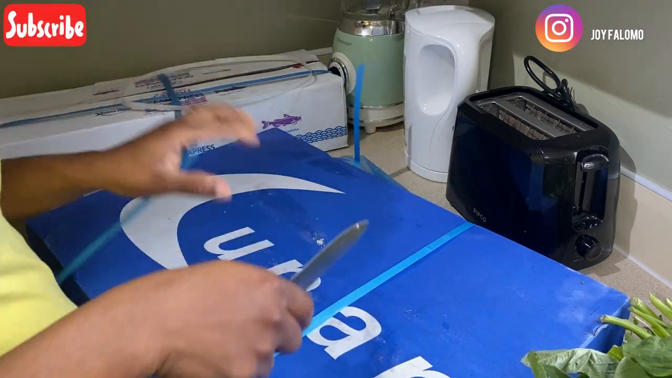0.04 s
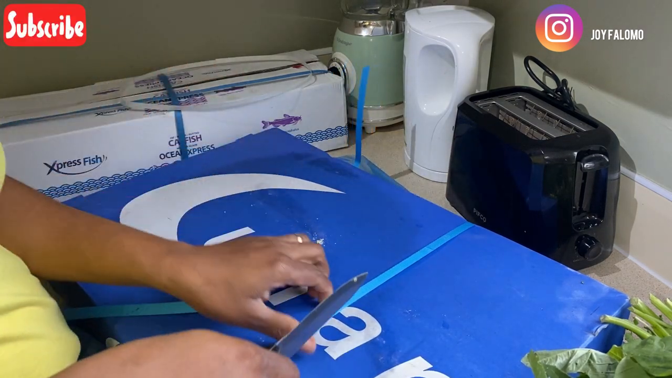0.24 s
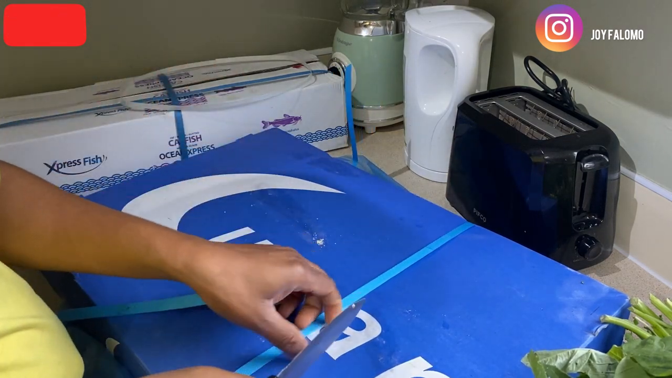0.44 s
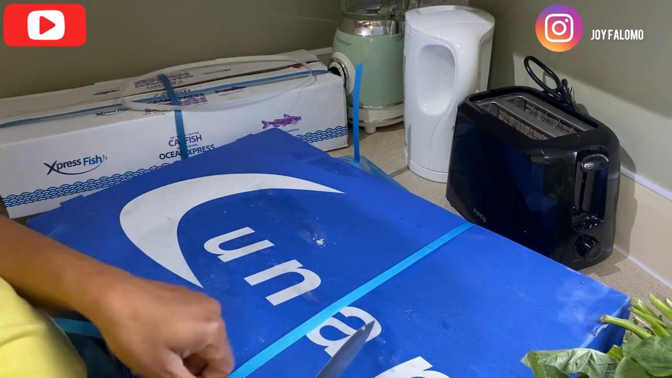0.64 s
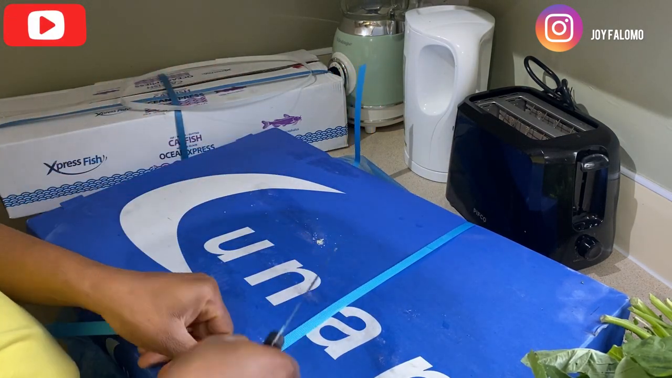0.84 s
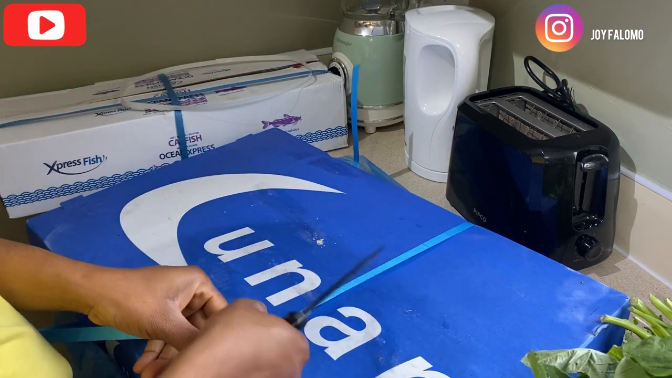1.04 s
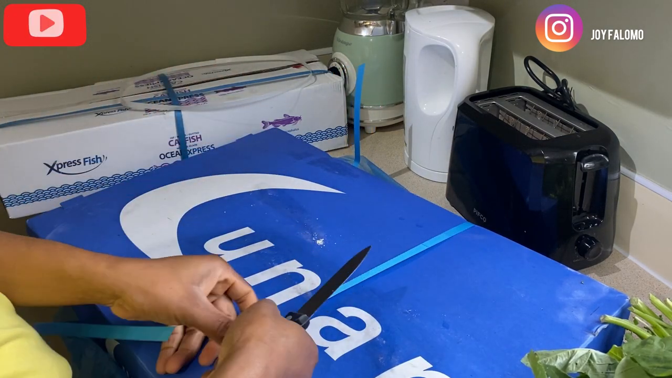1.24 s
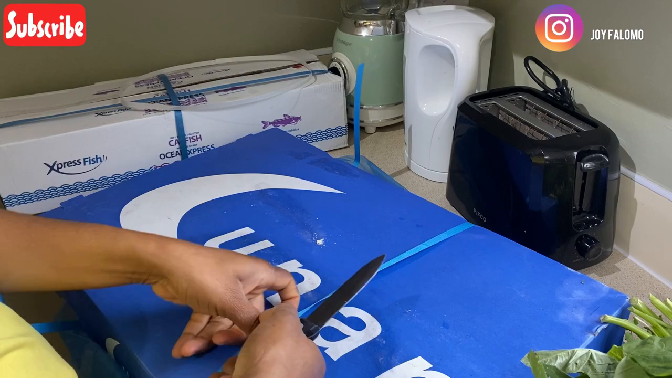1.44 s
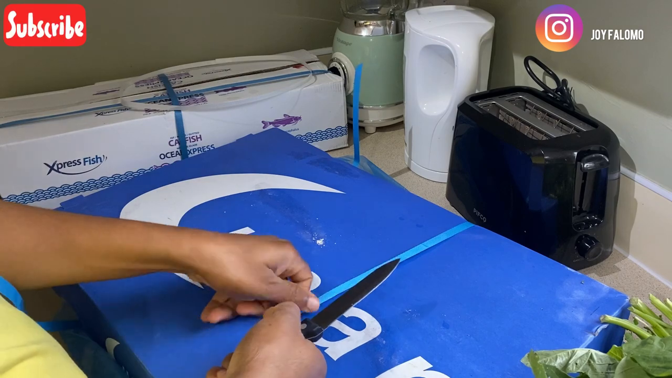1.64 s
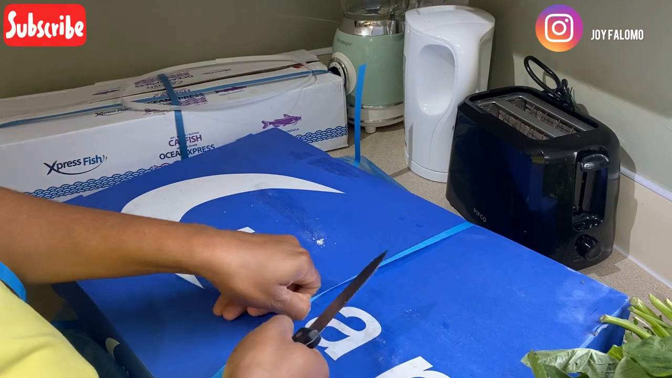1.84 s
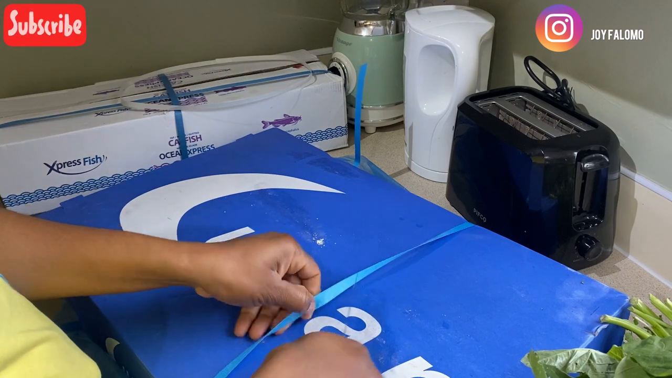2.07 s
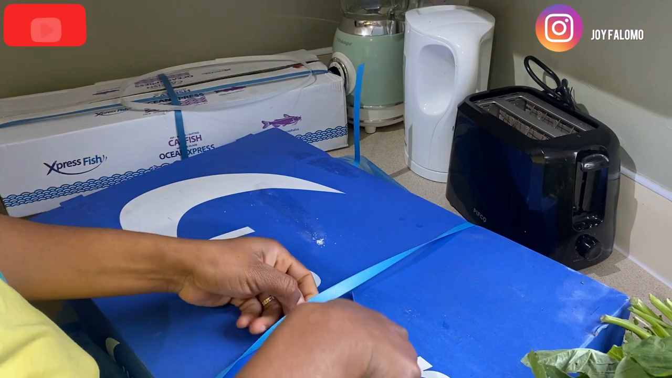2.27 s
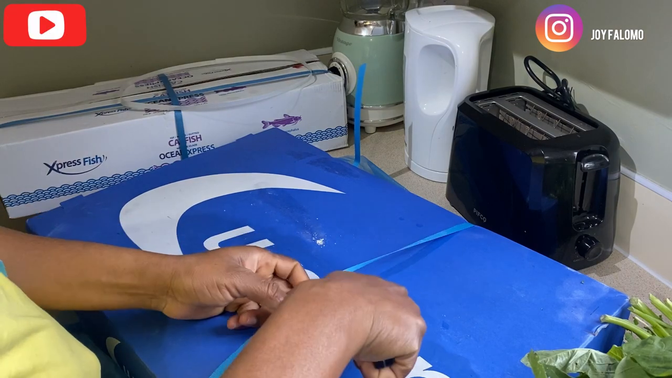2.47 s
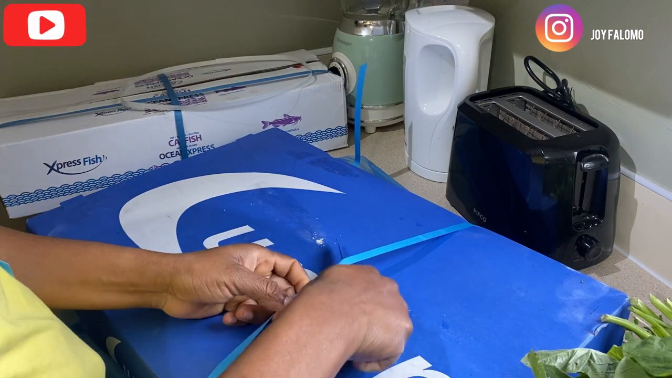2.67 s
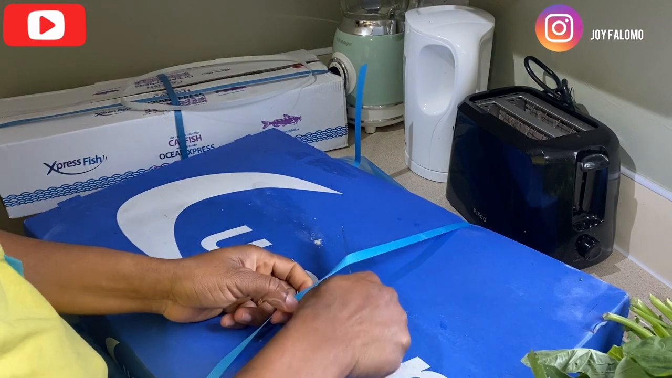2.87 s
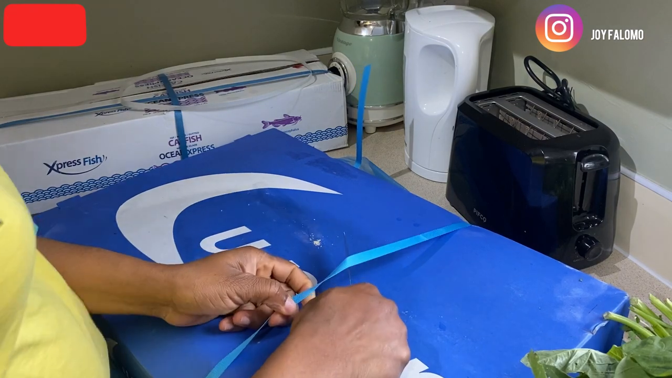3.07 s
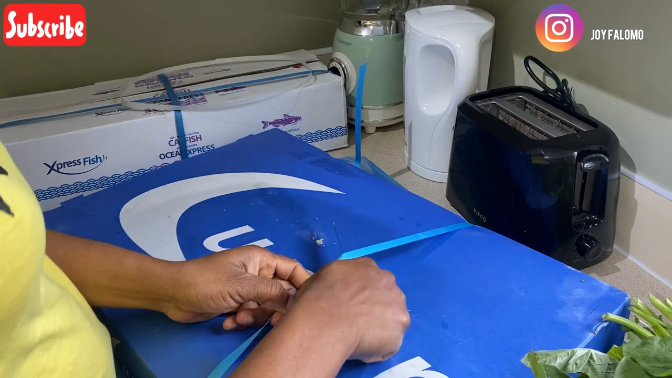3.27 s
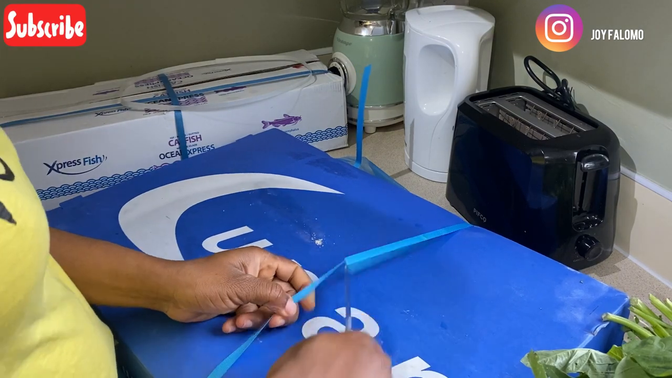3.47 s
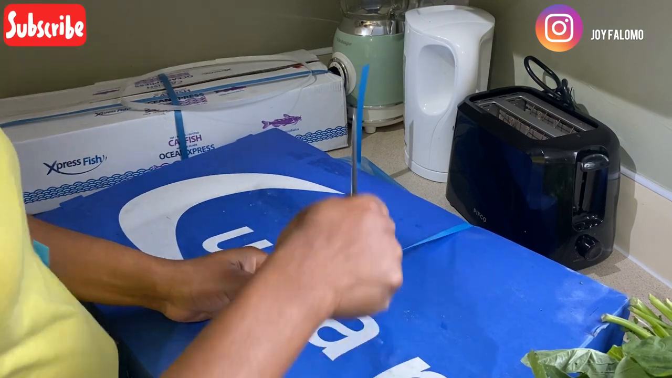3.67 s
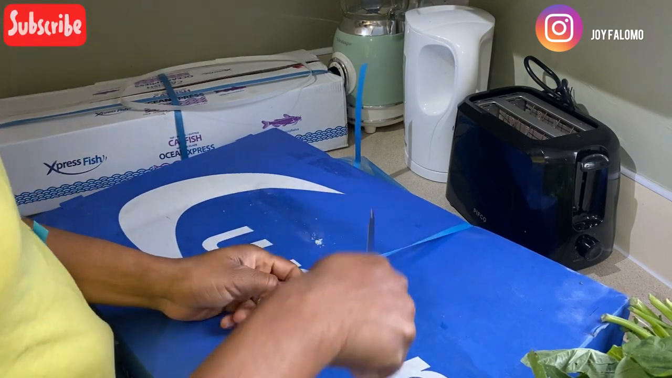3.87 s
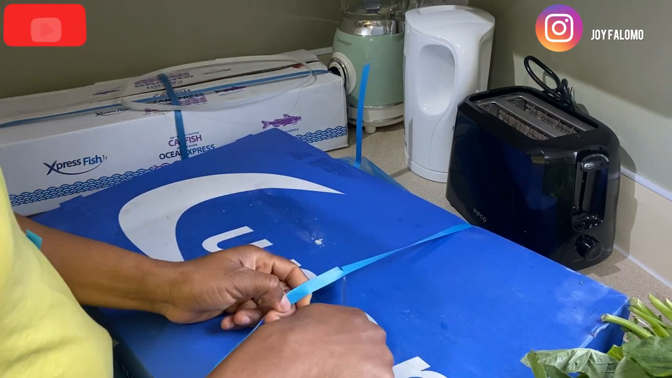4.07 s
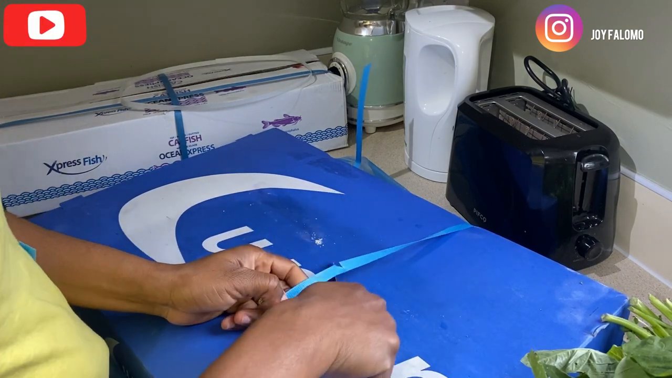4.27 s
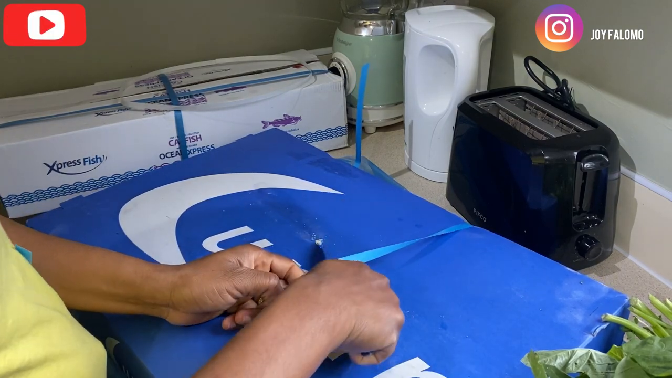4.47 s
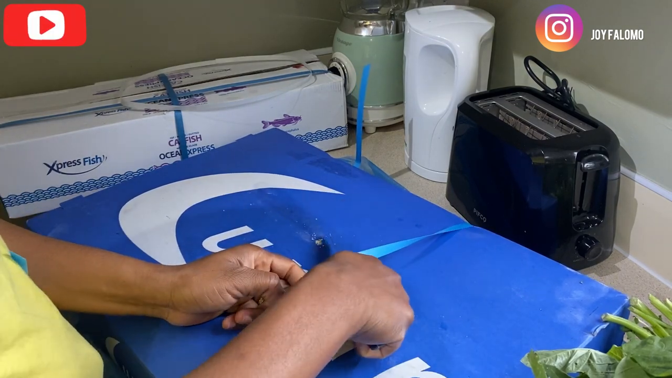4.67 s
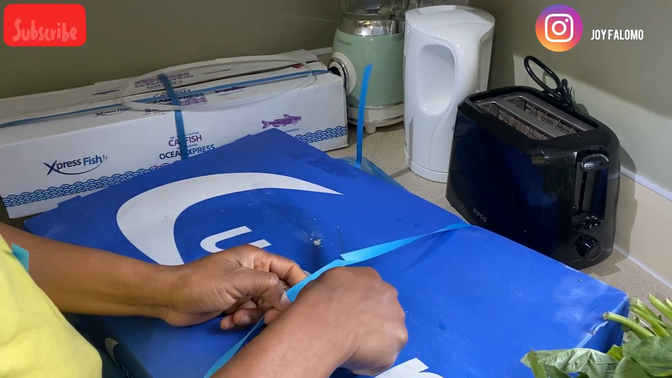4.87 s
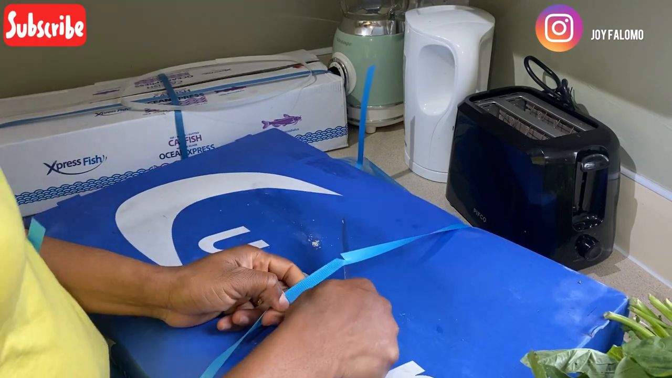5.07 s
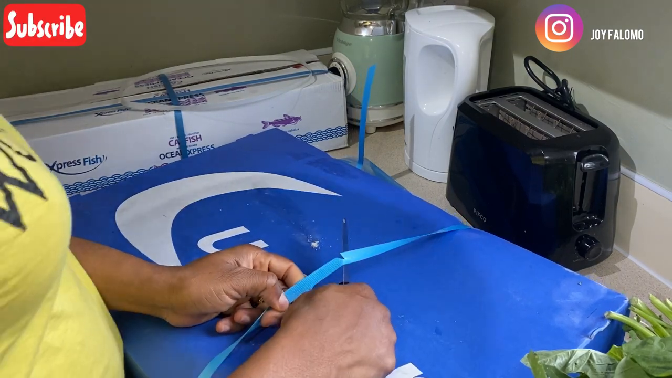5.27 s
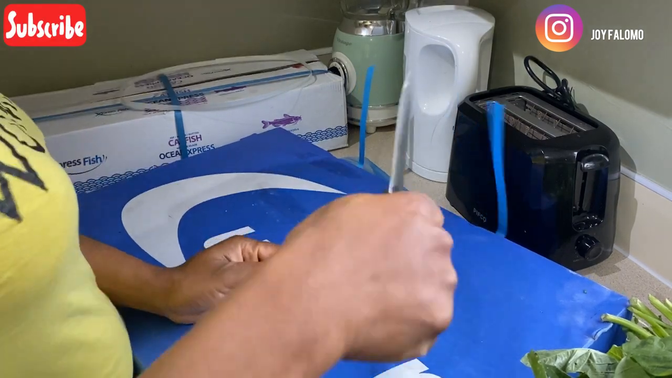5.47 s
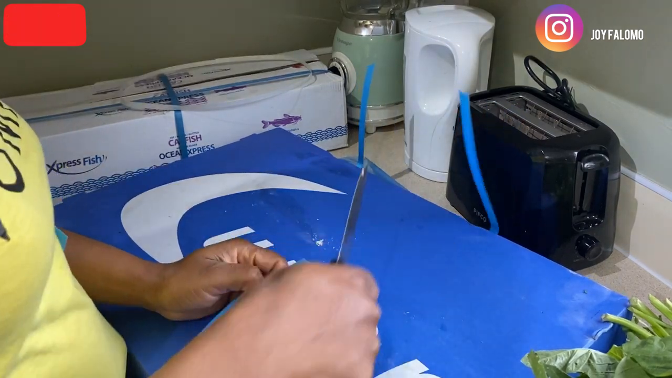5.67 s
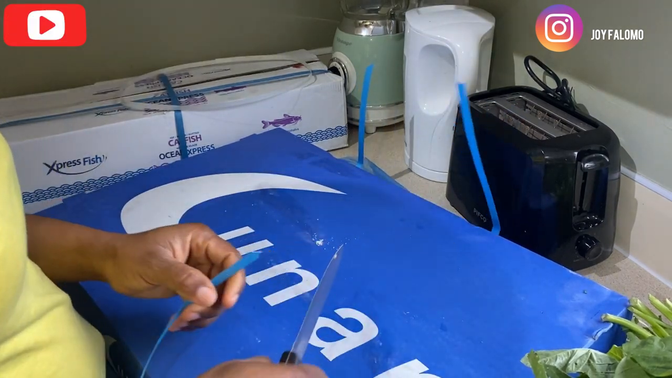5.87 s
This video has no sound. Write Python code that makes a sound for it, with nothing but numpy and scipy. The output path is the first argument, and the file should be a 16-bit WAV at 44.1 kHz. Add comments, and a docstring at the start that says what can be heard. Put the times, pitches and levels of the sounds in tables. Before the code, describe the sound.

A knife works at a taut plastic strap on a big cardboard carton, close to a stereo microphone in a kitchen corner. For the first three seconds, hands and blade make light, irregular, hollow knocks on the lid, with soft rubbing, faint hissing saw strokes, short scrapes, sharp little clicks and tiny creaks. Fibres crackle from about 3.1 seconds, and between 3.4 and 3.5 the strap tears partway in a quick cluster of loud cracks, ending with a slap on the box. Quieter sawing and creaking follow, with two knocks around 4.3 and 4.6. At 5.3 the strap snaps right through, the loudest moment: a bright crack and a hollow bang, with a brief hiss as the end whips away. The room rings shortly after each snap. Faint sliding and a few ticks continue until about 5.9, over a faint, low room tone.

```python
"""A kitchen knife saws through a taut plastic strap on a big cardboard carton.
The carton stands in the corner of a kitchen counter, close to a stereo microphone.
Hands and blade knock and slide on the lid; the strap's fibres crack, it tears halfway with a bang,
and later snaps right through. Each release slaps the hollow carton and the loose end whips away.
The corner walls answer at once and the room rings on, over a faint, low room tone."""
import sys
import numpy as np
from scipy import signal
from scipy.fft import rfft, irfft, next_fast_len
from scipy.io import wavfile
from scipy.ndimage import uniform_filter1d

SR = 44100
rng = np.random.default_rng(int(sys.argv[2]) if len(sys.argv) > 2 else 0)


def waveform_to_disk(signal):
    """Save audio, clipped to [-1, 1], as 16-bit WAV at the path in sys.argv[1]."""
    frames = np.transpose(np.atleast_2d(signal))
    scaled = np.clip(frames, -1, 1) * 32767
    samples = np.round(scaled).astype(np.int16)
    wavfile.write(sys.argv[1], SR, samples)


N = 261228
TIME = np.arange(N) / SR
RING_TIME = TIME[:SR // 2]

# Levels are relative within a column; each layer adds its own gain.
# the strap gives way in jerks and rebounds on the lid:
# start_s, crack_db, slap_db, pitch_hz, chirp_hz, slap_t60_s, body_db, thump_db, clack_db
SNAPS = [(3.3791, -8, -29, 335, 500, .05, -25.5, -54, -29.5),
         (3.4126, -8.5, -25, 480, 2010, .04, -29, -50, -36),
         (3.4775, -9.5, -8.5, 332, 910, 0.029, -16.5, -38, -20.5),
         (3.4856, -16, -14.5, 293, 600, 0.03, -22.5, -30, -26),
         (5.3037, 1.5, -0.5, 303.6, 2990, 0.041, -18, -22, -14),
         (5.3111, -14, -15.5, 410, 400, 0.029, -30, -44, -23)]
# single fibres crack under the edge: start_s, level_db, ring_db
FIBRE_CRACKS = [(0.018, -42, -57.5), (0.126, -52, -59), (0.259, -45, -54), (0.364, -27.5, -44.5),
                (0.561, -37, -57), (0.578, -41, -37.5), (1.218, -45, -55), (1.376, -47, -52),
                (1.573, -42, -59), (2.2873, -39, -68), (2.811, -35.5, -36.5), (2.9404, -47, -55),
                (2.977, -44, -62), (3.132, -38, -53), (3.153, -26, -56), (3.349, -25.5, -55),
                (3.3682, -16, -38), (3.3943, -18.5, -38), (3.4416, -33, -39), (3.462, -22, -28),
                (3.4665, -17, -21.5), (3.4808, -8.5, -20), (4.126, -39, -60), (4.3164, -39.5, -60),
                (4.753, -44.5, -66), (4.849, -37.5, -52), (5.009, -34, -48), (5.038, -33, -60),
                (5.1636, -51, -53), (5.191, -53, -52), (5.277, -25, -43), (5.573, -44, -58),
                (5.82, -51, -38)]
# the blade saws along the strap: start_s, end_s, level_db, bright_db
BLADE_SLIDES = [(0.164, 0.416, -54.5, 5), (0.452, 0.768, -56, 5), (0.83, 1.15, -58.5, 2),
                (1.227, 1.46, -58, 3.5), (1.593, 1.945, -60.5, -3), (1.956, 2.167, -56.5, 1.5),
                (2.185, 2.362, -61.5, 0), (2.49, 2.765, -56, 0.5), (2.816, 3, -51.5, 0),
                (3.105, 3.21, -47, 2), (3.199, 3.29, -55, 2.5), (3.314, 3.526, -45, -1),
                (3.545, 3.725, -57.5, -1), (3.768, 4.034, -51, 2), (4.054, 4.295, -55.5, -0.5),
                (4.293, 4.505, -53, -2), (4.827, 5.293, -52, 1), (5.353, 5.78, -53.5, 0.5)]
# short, hard scrapes of blade or strap: start_s, end_s, rasp_db, pitch_hz, hiss_db, lid_db
SCRAPES = [(0.163, 0.206, -51.5, 1330, -68, -56), (0.278, 0.377, -44.5, 1610, -57.5, -36.5),
           (0.56, 0.595, -44.5, 1440, -45.5, -36.5), (0.846, 0.92, -55, 1250, -67, -42),
           (0.93, 0.968, -48, 1490, -45, -30.5), (1.571, 1.603, -48.5, 2080, -53.5, -40),
           (1.655, 1.696, -54, 2260, -51.5, -44), (1.759, 1.798, -42, 2060, -57, -41),
           (3.445, 3.493, -40.5, 1840, -40, -30), (4.059, 4.088, -50, 1470, -55, -46.5),
           (4.116, 4.162, -48, 1290, -60, -56), (4.562, 4.574, -45, 2130, -42.5, -38.5),
           (5.271, 5.294, -45.5, 1510, -47, -36), (5.297, 5.301, -30, 2500, -26, -33),
           (5.612, 5.672, -48.5, 1130, -81, -67), (5.716, 5.75, -53.5, 2170, -59, -79),
           (5.805, 5.887, -70, 2500, -45.5, -74)]
# the edge clicks against the stiff strap: start_s, level_db
BLADE_TAPS = [(0.464, -44), (0.8395, -39), (0.956, -31.5), (1.509, -44), (1.574, -43), (1.826, -39),
              (2.2505, -26.5), (2.2873, -33), (3.153, -30), (3.3795, -23.5), (3.4135, -26), (4.56, -37),
              (5.574, -43)]
# the bent strap and the pressed board creak: start_s, pitch_hz, level_db, length_s
CREAKS = [(0.571, 695, -30, 0.022), (1.757, 2064, -46, 0.04), (1.78, 520, -44, 0.037),
          (2.94, 484, -48.5, 0.061), (3.17, 420, -47.5, 0.087), (4.057, 540.5, -43.5, 0.072),
          (4.059, 1240, -60, 0.059), (4.057, 873, -50, 0.048), (4.057, 1510, -66, 0.036),
          (4.147, 1117, -42.5, 0.029), (4.23, 382, -49.5, 0.042), (4.475, 520, -48, 0.026),
          (5.614, 1330, -42, 0.012)]
# hand, blade and strap knock on the lid: start_s, level_db, pitch_hz, thump_db, clack_db, rise_s
LID_KNOCKS = [(0.146, -41, 564, -52, -34, 0.0024), (0.151, -24, 382, -40.5, -42, 0.0017),
              (0.253, -31.5, 476, -37.5, -38, 0.0012), (0.366, -29, 538, -64, -33.5, 0.0006),
              (0.465, -40, 520, -58, -48, .001), (0.573, -31, 550, -44, -59, 0.0044),
              (0.8396, -31.5, 350, -41.5, -39, 0.0011), (0.922, -26.5, 390, -45, -37, 0.0034),
              (0.9555, -21.5, 374, -48, -34.5, .001), (1.007, -42, 446, -63, -60, .002),
              (1.033, -25, 310, -43, -70, 0.0053), (1.112, -39, 437, -54, -62, .003),
              (1.224, -48, 453, -67, -51, 0.0035), (1.266, -37, 372, -55, -46.5, 0.0018),
              (1.355, -38, 481, -65, -54, 0.0027), (1.432, -47, 420, -66, -57, 0.0023),
              (1.507, -39.5, 400, -64, -47, 0.0015), (1.578, -36.5, 355, -48, -44, 0.0023),
              (1.826, -33.5, 381, -67, -42.5, 0.00062), (1.966, -42, 447, -70, -51, 0.0036),
              (2.085, -39.5, 490, -71, -69, 0.0011), (2.2509, -26.5, 378, -39.5, -36.5, 0.0011),
              (2.302, -34, 444, -54, -42.5, 0.0016), (2.605, -42, 500, -43, -55, 0.0014),
              (2.664, -34, 413, -52, -68, 0.0044), (2.758, -40, 285, -41.5, -54, 0.0026),
              (3.153, -27.5, 364, -62, -33, 0.0023), (4.312, -30.5, 322, -41, -35.5, .007),
              (4.56, -25, 401.6, -38, -47, 0.0031)]
# the hand drags over the lid: start_s, end_s, level_db
HAND_DRAGS = [(0.23, 0.666, -49.5), (0.842, 1.162, -51.5), (1.214, 1.477, -55), (1.6, 2.157, -53.5),
              (2.197, 2.376, -47), (2.449, 2.723, -48.5), (2.824, 3.005, -48), (3.11, 3.39, -48),
              (3.358, 3.528, -36.5), (4.09, 4.27, -47), (4.309, 4.522, -46.5), (4.57, 4.599, -37),
              (4.735, 5.104, -55), (5.25, 5.556, -45.5)]

# modes of the blade's click: pitch_hz, level_db, t60_s
TAP_MODES = [(980, -4, 0.032), (1285, -6.5, 0.038), (1730, -4, 0.017), (2144, -3.5, 0.022),
             (2620, -6, 0.0087), (3400, -3.5, 0.011), (4100, -10, 0.012), (4700, -9.5, 0.0066)]
# modes of the hollow carton: pitch_hz, level_db, base_t60_s
CARTON_MODES = [(48, -10, 0.25), (71.7, -4, 0.51), (99.6, 1.5, .12), (116.6, 2.5, 0.3), (129.5, -4, 0.26),
                (192, -8.5, 0.27), (257.2, -5.5, 0.25), (288.4, -0.5, 0.15), (375.4, 2, 0.23),
                (422, 0, 0.11), (520, -0.5, 0.11), (572, -7.5, 0.16), (616.6, 1, 0.086), (762, -4, 0.15),
                (1120, -14, 0.14), (1250, -2, 0.16), (1430, -15, 0.042), (1790, -27, 0.065),
                (1890, 18, 0.024), (2280, -18, 0.07)]

# spectrum of cracking plastic: frequency_hz, level_db
CRACK_COLOUR = [(40, -14), (150, 4), (400, 12.5), (900, 3.5), (2500, 5), (4700, 1.5), (8000, 4), (11500, 1),
                (16000, -14)]
# spectrum of the taut strap's brief ring: frequency_hz, level_db
STRAP_COLOUR = [(5000, -18), (9000, -16), (10400, 6.5), (11200, 3), (12200, 1), (14000, -18)]
# spectrum of sliding on plastic: frequency_hz, level_db
HISS_COLOUR = [(30, -2), (100, 14.5), (300, 8.5), (600, 7), (1300, 7.5), (2600, 7), (5000, 4.5),
               (8000, 3.5), (11500, 1), (13500, -3), (16000, -21)]
# spectrum of a scrape: multiple_of_pitch, level_db
RASP_COLOUR = [(.15, -10), (.5, -2), (.8, -1.5), (1, 4), (1.25, -6), (2, -8), (4, -19), (8, -71)]
# spectrum of the board's clack: frequency_hz, level_db
CLACK_COLOUR = [(200, -29), (700, 4.5), (1250, 7.5), (2000, 2.5), (3000, -8.5), (5000, -17), (9000, -52)]
# spectrum of the rubbed lid: frequency_hz, level_db
RUB_COLOUR = [(30, -12), (70, -17), (118, -1.5), (160, -12.5), (270, -3), (380, -1.5), (520, 1),
              (720, -9.5), (950, -12.5), (2000, -20), (5000, -54)]
# spectrum of the room tone: frequency_hz, level_db
ROOM_TONE_COLOUR = [(20, -2.5), (65, 9), (120, -5), (200, -1.5), (450, -7), (1000, -12), (3000, -28),
                    (10000, -68), (16000, -40)]

# the kitchen's reverberation by band: centre_hz, level_db, t60_s, side_db
KITCHEN_BANDS = [(61, -6.5, 0.77, -9.5), (153, -9, 0.95, -8), (442, -9, 0.28, 0.5), (980, -8, 0.44, 6),
                 (2500, -6.5, 0.42, 0), (6400, -7.5, 0.29, 2), (8600, -7, 0.33, -69),
                 (15100, -2.5, 0.21, -34)]
# phase between the two microphone ports: frequency_hz, left_lead_rad
PORT_PHASE = [(20, 0), (1200, 0), (2400, .55), (5400, .1), (6400, .35), (7400, -.2), (9050, -3.14),
              (10900, -6.15), (11500, -6.45), (13300, -9.42), (14800, -12.5), (16000, -12.57)]
# balance of the two ports: frequency_hz, left_over_right_db
PORT_BALANCE = [(120, -1), (550, 2.5), (1100, 0.5), (2400, 2), (5000, 4.5), (8000, -0.5)]


def snap_cracks():
    """Each release is a crack in the strap, a hiss as it whips off and a clack of the board."""
    out = np.zeros(N)
    for start, crack_db, *_, clack_db in SNAPS:
        add(out, start, from_db(crack_db - 10.5) * burst(CRACK_COLOUR, t60=0.023))
        add(out, start, from_db(crack_db - 34) * burst(HISS_COLOUR, t60=0.23))
        add(out, start, from_db(clack_db - 2) * burst(CLACK_COLOUR, t60=0.053))
    return out


def scattered_cracks(walls=3):
    """A snap throws one crackle at the microphone and another at each wall: a dense, smooth tail."""
    return snap_cracks() + sum(kitchen(snap_cracks()) for _ in range(walls)) / np.sqrt(walls)


def snap_slaps():
    """The released strap lands a hollow slap that shakes the lid and rattles the carton."""
    out = np.zeros(N)
    for start, _, slap_db, hz, chirp_hz, t60, body_db, thump_db, clack_db in SNAPS:
        slap = lid_slap(hz, chirp_hz, chirp_s=0.000629, rise_s=0.0011, t60=t60)
        shudder = burst(RUB_COLOUR, t60=0.18, rise_s=0.0029)
        ring = carton(thump_db, body_db - 1.5, clack_db - 23, t60_scale=0.82, detune=0.003, rattle=0.09)
        add(out, start, from_db(slap_db) * slap + ring)
        add(out, start, from_db(slap_db - 20.5) * shudder)
    return out


def fibre_cracks():
    """A parting fibre is a dry click with a brief, bright ring of the strap."""
    out = np.zeros(N)
    for start, db, ring_db in FIBRE_CRACKS + fraying():
        add(out, start, from_db(db - 7) * burst(CRACK_COLOUR, t60=0.023))
        add(out, start, from_db(ring_db + 5) * burst(STRAP_COLOUR, t60=0.011))
    return out


def fraying(run_s=0.018, rise_db_per_s=353, nicks_per_s=16):
    """Rows of small cracks: fibres part ever louder before each release, and each pass nicks a few."""
    small = []
    for release, *_ in SNAPS:
        small += [(release - lead, -41 - rise_db_per_s * lead) for lead in run_s * rng.random(3)]
    for start, end, hiss_db, _ in BLADE_SLIDES:
        moments = start + np.cumsum(rng.exponential(1 / nicks_per_s, size=12))
        levels_db = hiss_db + rng.normal(5, 3.5, size=12)
        small += [(at, db) for at, db in zip(moments, levels_db) if at < end]
    return [(at, db, db - 14) for at, db in small]  # small fibres barely ring the strap


def blade_slides():
    """Each pass of the rocking blade hisses and chatters, over the faint rustle of holding the strap."""
    rocking_hiss = [band * pressure(waver_db=2, per_s=14) for band in steel_hiss(split_hz=10600)]
    passes = np.zeros(N)
    for start, end, db, bright_db in BLADE_SLIDES:
        push = from_db(db) * stroke(start, end, attack_s=0.06, release_s=0.07)
        passes += push * on_edge(rocking_hiss, bright_db)
    rustle = from_db(-65) * coloured(rng.standard_normal(N), HISS_COLOUR)
    chatter = pressure(waver_db=2, per_s=75)
    return (passes + rustle) * chatter


def steel_hiss(split_hz):
    """Fine-grained hiss of steel on plastic, split into a dull band and its treble."""
    hiss = coloured(friction(N, slips_per_s=900, spread_db=2.5, smooth=1), HISS_COLOUR)
    dull = signal.sosfiltfilt(signal.butter(2, split_hz, fs=SR, output="sos"), hiss)
    return dull, hiss - dull


def on_edge(hiss, bright_db):
    """The treble rises and the dull band falls as the contact moves to an edge."""
    dull, treble = hiss
    return dull * from_db(-bright_db) + treble * from_db(bright_db)


def scrapes(ramp_share=0.22):
    """A short, hard stroke of the very edge rasps at a pitch of its own, hisses and shakes the lid."""
    out = np.zeros(N)
    rub = lid_rub()
    hiss = on_edge(steel_hiss(split_hz=6700), bright_db=5)
    for start, end, rasp_db, hz, hiss_db, lid_db in SCRAPES:
        ramp_s = ramp_share * (end - start)
        grit = friction(len(RING_TIME), slips_per_s=1300, spread_db=0, smooth=0.61)
        rasp = coloured(grit, np.array(RASP_COLOUR) * [hz, 1])
        contact = from_db(hiss_db) * hiss + from_db(lid_db - 3) * rub
        add(contact, start - ramp_s / 2, from_db(rasp_db) * rasp)
        out += swell(start, end, ramp_s, ramp_s) * contact
    return out


def blade_taps(detune=0.036):
    """Steel meets hard plastic: one sharp impulse into a few short modes."""
    out = np.zeros(N)
    for start, tap_db in BLADE_TAPS:
        for k, (hz, db, t60) in enumerate(TAP_MODES):
            pitch_hz = hz * (1 + detune * rng.standard_normal())
            mode = (-1) ** k * np.sin(2 * np.pi * pitch_hz * RING_TIME) * dying(t60)
            add(out, start, from_db(tap_db + db - 6) * mode)
    return out


def creaks(waver=0.025):
    """Bent plastic and pressed board give brief, wavering tones."""
    out = np.zeros(N)
    for start, hz, db, length_s in CREAKS:
        size = int(length_s * SR)
        unrest = rms_one(uniform_filter1d(rng.standard_normal(SR // 4), size=100))[:size]
        tone = sine(hz * (1 + waver * unrest))
        add(out, start, from_db(db + 2) * tone * signal.windows.tukey(size, 0.7))
    return out


def lid_knocks():
    """Every touch rings the carton; hard ones add a clack of the board and a tick of the blade."""
    out = np.zeros(N)
    for start, db, hz, thump_db, clack_db, rise_s in LID_KNOCKS:
        slap = from_db(db - 6.5) * lid_slap(hz, chirp_hz=500, chirp_s=0.00093, rise_s=rise_s, t60=0.15)
        ring = carton(thump_db + 0.5, db - 10.5, clack_db - 24, t60_scale=0.63, detune=0.052)
        clack = from_db(clack_db - 4.5) * burst(CLACK_COLOUR, t60=0.062, rise_s=rise_s)
        tick = from_db(clack_db - 18) * burst(CRACK_COLOUR, t60=0.083)
        add(out, start, slap + building(rise_s) * ring)
        add(out, start, clack + tick)
    return out


def lid_slap(hz, chirp_hz, chirp_s, rise_s, t60, sag_share=0.594, sag_s=0.00884):
    """A bending wave crosses the lid, treble first, and settles on the pitch of the spot struck."""
    chirp = chirp_hz * np.exp(-RING_TIME / chirp_s)
    sag = 1 + sag_share * np.exp(-RING_TIME / sag_s)  # stiffer while bent, the lid starts sharp
    return sine(hz * sag + chirp) * building(rise_s) * dying(t60)


def carton(thump_db, body_db, clack_db, t60_scale, detune, rattle=0.02, jolts_per_s=140):
    """A blow rings the carton's modes; their sign, strength and pitch vary with the place struck."""
    out = 0
    for hz, db, t60 in CARTON_MODES:
        strength = from_db(db + rng.normal(0, 1))
        whole_box = hz < 220
        if whole_box:  # the heavy box is pushed in: its thump builds after the blow
            drive = from_db(thump_db) * building(rise_s=0.0058)
        else:
            drive = from_db(body_db if hz < 950 else clack_db) * rng.choice([-1, 1])
        # the loose lid rattles on the box, shaking the pitch of the upper modes
        jolts = np.interp(RING_TIME * jolts_per_s, np.arange(80), rng.standard_normal(80))
        shake = (0 if whole_box else rattle) * jolts
        pitch_hz = hz * (1 + detune * rng.standard_normal() + shake)
        out += strength * drive * sine(pitch_hz) * dying(t60 * t60_scale)
    return out


def hand_drags(resting_db=-66.5):
    """The hand shifts over the lid in separate, uneven pushes, and rubs faintly between them."""
    push = sum(from_db(db) * stroke(start, end, attack_s=0.036, release_s=0.097)
               for start, end, db in HAND_DRAGS)
    return (push + from_db(resting_db)) * pressure(waver_db=2, per_s=14) * lid_rub()


def lid_rub():
    """Skin catches and slips on the board; part of that drag hums in the carton's modes."""
    drag = friction(N, slips_per_s=170, spread_db=2.5, smooth=0.5)
    ring = carton(thump_db=-6, body_db=0, clack_db=-35, t60_scale=0.93, detune=0.0041)
    hollow = rms_one(signal.fftconvolve(drag, ring)[:N])
    surface = coloured(friction(N, slips_per_s=120, spread_db=1.5, smooth=0.76), RUB_COLOUR)
    return 0.47 * hollow + 0.68 * surface


def kitchen(sound, early_db=-7, early_t60=0.03, gap_s=0.0015):
    """Stereo reflections at the microphone: counter and corner answer at once, the room rings on."""
    size = len(RING_TIME)
    hz = np.fft.rfftfreq(size, 1 / SR)
    white = rfft(rng.standard_normal((2, size)))
    onset = np.clip(RING_TIME / gap_s - 0.5, 0, 1)
    early = from_db(early_db) * rms_one(onset * dying(early_t60))
    response = 0
    for centre_hz, db, t60, side_db in KITCHEN_BANDS:
        band = at_hz([(row[0], row[0] == centre_hz) for row in KITCHEN_BANDS], hz)
        mid, side = irfft(white * band, size)
        stereo = mid + from_db(side_db) * side * [[1], [-1]]
        envelope = np.hypot(rms_one(onset * dying(t60)), early)
        response += from_db(db) * envelope / np.sqrt(size) * stereo
    return signal.fftconvolve(sound[None], response, axes=1)[:, :N]


def room_tone():
    """A faint, steady, low noise behind the work."""
    return from_db(-58) * coloured(rng.standard_normal(N), ROOM_TONE_COLOUR)


def friction(size, slips_per_s, spread_db, smooth):
    """Tiny stick-slip clicks of uneven size over a smooth sliding noise."""
    clicks = from_db(spread_db * np.minimum(rng.exponential(1, size), 3.5)) * rng.choice([-1, 1], size)
    slipping = rng.random(size) < slips_per_s / SR
    return rms_one(clicks * slipping) + smooth * rng.standard_normal(size)


def burst(colour, t60, rise_s=0):
    """Very many overlapping modes struck at once, heard as dying noise."""
    size = SR // 8
    return coloured(rng.standard_normal(size), colour) * (building(rise_s) * dying(t60))[:size]


def stroke(start, end, attack_s, release_s, arch_db=2):
    """One push of the hand, fastest and loudest at its middle."""
    off_middle = (2 * TIME - start - end) / (end - start)
    return swell(start, end, attack_s, release_s) * from_db(-arch_db * np.minimum(off_middle ** 2, 2))


def swell(start, end, attack_s, release_s):
    """Attack, hold and release, with the ramps centred on start and end."""
    rise, fall = (TIME - start) / attack_s, (end - TIME) / release_s
    return np.clip(np.minimum(rise, fall) + 0.5, 0, 1)


def pressure(waver_db, per_s):
    """The uneven push of a hand, as a wandering gain."""
    steps = rng.standard_normal(SR // 50)
    return from_db(waver_db * np.interp(TIME * per_s, np.arange(len(steps)), steps))


def building(rise_s):
    """A contact takes a moment to reach full force."""
    return 1 - np.exp(-RING_TIME / max(rise_s, 1e-4))


def dying(t60):
    """A ring falls by 60 dB in t60 seconds."""
    return np.exp(-np.log(1000) * RING_TIME / t60)


def sine(hz):
    """A tone that follows a moving pitch."""
    return np.sin(2 * np.pi * np.cumsum(hz) / SR)


def coloured(sound, colour):
    """Shape a sound with a smooth spectrum; rms 1."""
    size = next_fast_len(len(sound))
    gain = from_db(at_hz(colour, np.fft.rfftfreq(size, 1 / SR)))
    return rms_one(irfft(rfft(sound, size) * gain, size)[:len(sound)])


def at_hz(points, hz):
    """Read a two-column table on a log-frequency axis."""
    points_hz, values = np.transpose(points)
    return np.interp(np.log(np.maximum(hz, 1)), np.log(points_hz), values)


def add(track, start_s, sound):
    """Mix a sound into a track at a time."""
    at = max(int(start_s * SR), 0)
    track[at:at + len(sound)] += sound[:max(N - at, 0)]


def from_db(db):
    return 10 ** (np.asarray(db) / 20)


def rms_one(x):
    return x / np.sqrt(np.mean(x ** 2) + 1e-20)


def scene():
    """The work on the carton and the room tone, heard from close by in the kitchen."""
    background = room_tone()
    handling = lid_knocks() + blade_taps() + fibre_cracks() + hand_drags()
    handling += blade_slides() + scrapes() + creaks()
    slaps = snap_slaps()
    # the slaps sound drier than the rest
    reflections = kitchen(handling + background + from_db(-4.5) * slaps)
    return scattered_cracks() + slaps + handling + reflections + background


def record(dry, low_cut_hz=24.6, high_cut_hz=16000):
    """The microphone's ports differ in level and treble phase; it rounds peaks, cuts bottom and top."""
    size = next_fast_len(N + SR // 10)
    hz = np.fft.rfftfreq(size, 1 / SR)
    half_each_way = np.array([[0.5], [-0.5]])
    balance = from_db(half_each_way * at_hz(PORT_BALANCE, hz))
    phase = half_each_way * np.interp(hz, *np.transpose(PORT_PHASE))
    heard = irfft(rfft(dry, size) * balance * np.exp(1j * phase), size)[:, :N]
    low_cut = signal.butter(1, low_cut_hz, "high", fs=SR, output="sos")
    high_cut = signal.ellip(10, 0.2, 80, high_cut_hz, fs=SR, output="sos")
    rounded = np.tanh(signal.sosfilt(low_cut, heard))
    return signal.sosfilt(high_cut, rounded)


dry = scene()
out = record(dry)
waveform_to_disk(out)
```